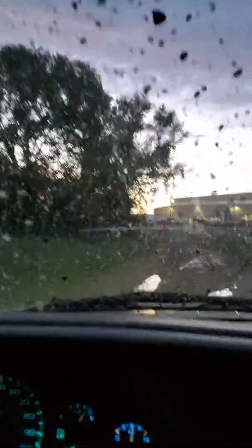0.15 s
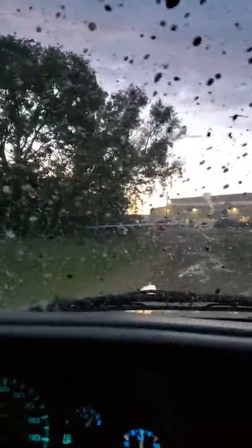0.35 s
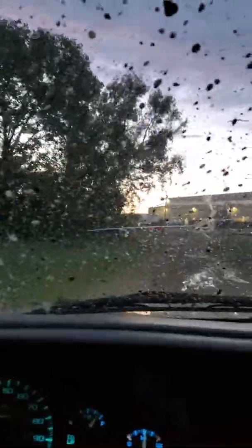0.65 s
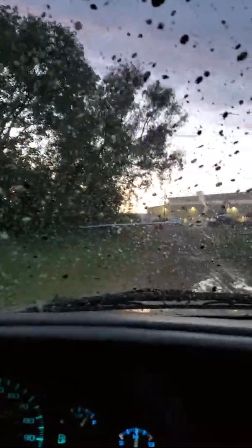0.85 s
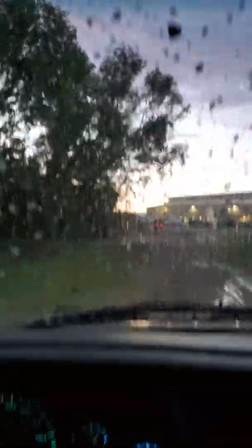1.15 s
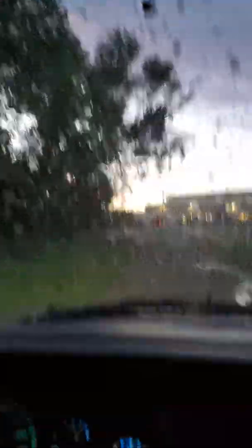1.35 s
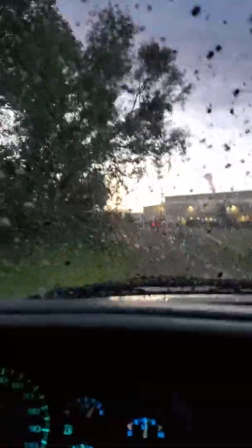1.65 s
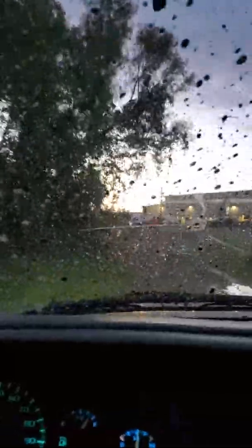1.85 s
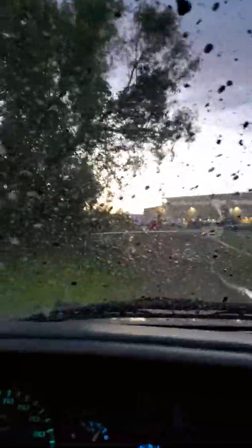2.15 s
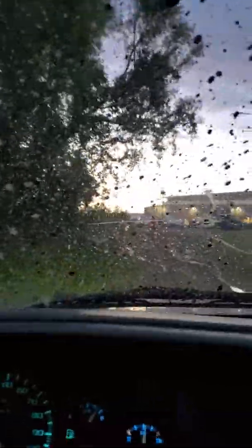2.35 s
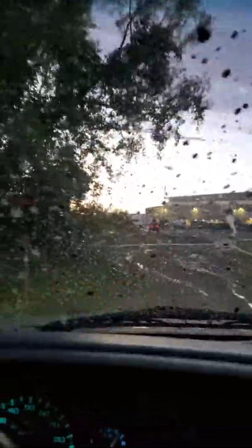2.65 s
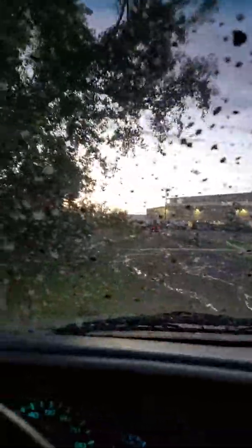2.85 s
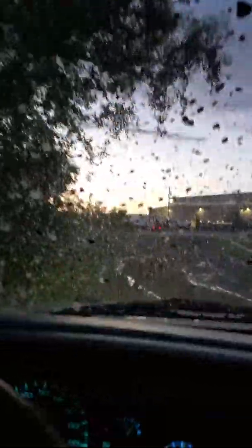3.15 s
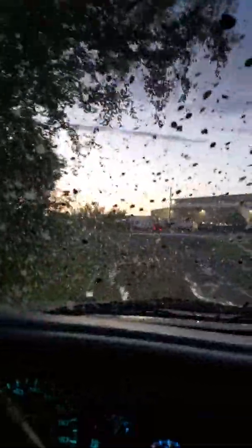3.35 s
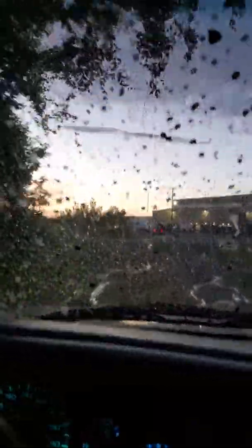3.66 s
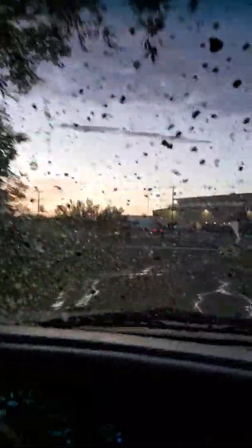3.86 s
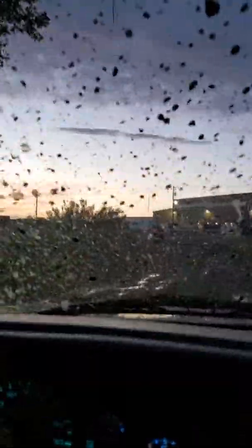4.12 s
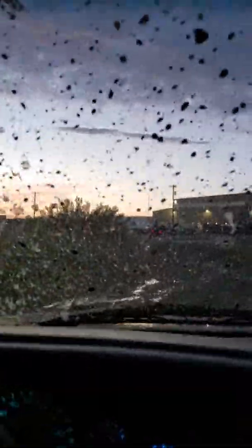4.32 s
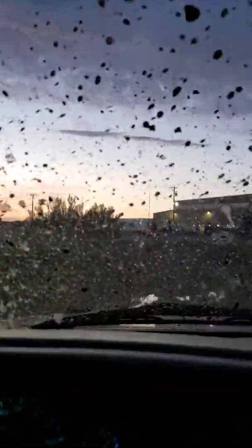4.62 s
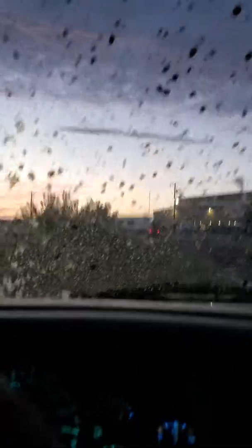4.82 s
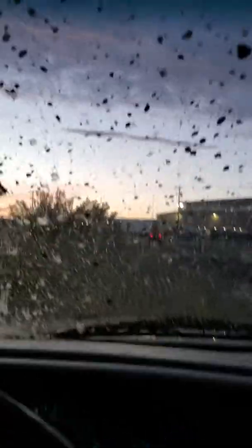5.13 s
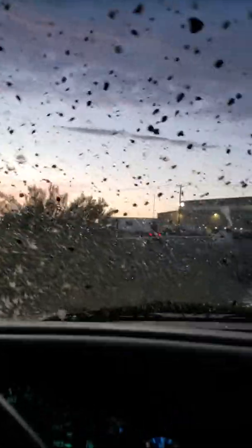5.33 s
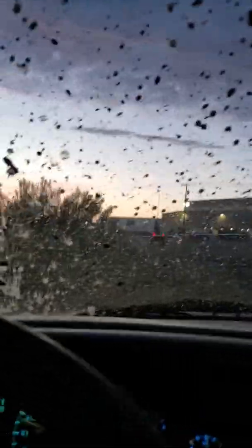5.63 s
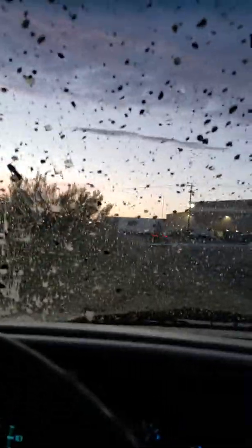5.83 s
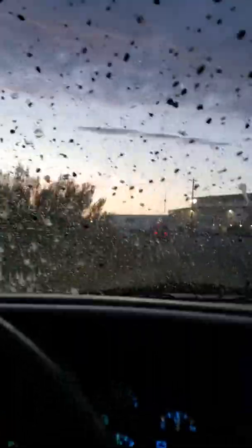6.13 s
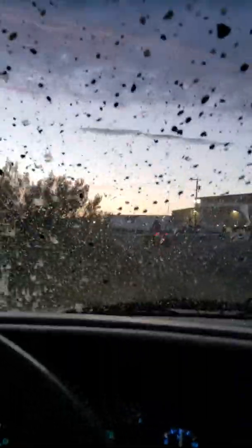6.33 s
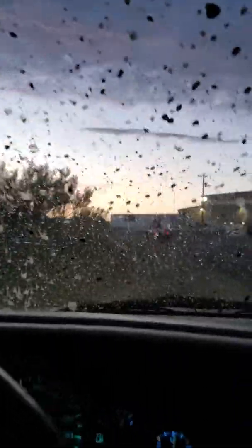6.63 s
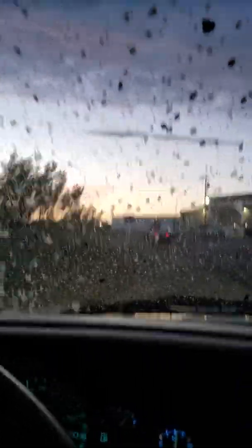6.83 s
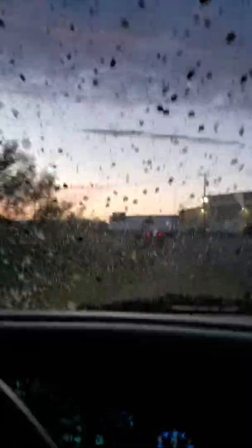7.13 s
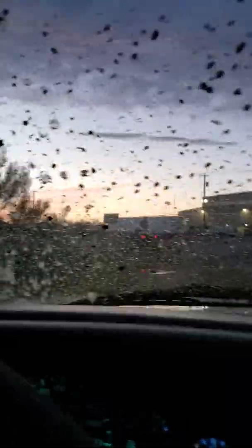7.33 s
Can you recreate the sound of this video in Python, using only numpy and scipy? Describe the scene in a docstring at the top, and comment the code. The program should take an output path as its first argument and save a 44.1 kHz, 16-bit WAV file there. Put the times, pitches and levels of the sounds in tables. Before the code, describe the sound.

A big engine drones from inside a vehicle on a muddy track, easing off as a loose part rattles and wheels splash through a rut.

```python
"""A V8 exhaust drones, then sinks towards idle, heard from the driver's seat of an SUV on muddy ground.
Close around a phone's two microphones, the body rumbles over ruts and a loose fitting clacks at the jolts.
Under the floor the tyres roar and hiss; late on, the front, then the rear wheels bang through a
water-filled rut and throw mud at the floor. Further off, the steering pump moans faintly."""
import sys
import numpy as np
from scipy import signal
from scipy.fft import rfft, irfft, next_fast_len
from scipy.io import wavfile
from scipy.ndimage import uniform_filter1d, map_coordinates

SR = 44100
rng = np.random.default_rng(int(sys.argv[2]) if len(sys.argv) > 2 else 0)


def output_pcm(signal):
    """Save a mono or channel-first signal as 16-bit PCM at the path in sys.argv[1].

    Samples are clipped to [-1, 1] before scaling.
    """
    pcm = np.clip(np.atleast_2d(signal).T, -1, 1) * 32767
    wavfile.write(sys.argv[1], SR, np.round(pcm).astype(np.int16))


N = 329868


# The exhaust from the driver's seat. Each row: time in seconds, firing rate in Hz, level in dB.
ENGINE_RUN = [(0, 109.3, -11.5), (.48, 108.6, -15), (.75, 104.8, -14.5), (.98, 100.9, -15.5),
              (1.2, 93.6, -18.5), (1.42, 87, -16.5), (1.78, 84.44, -16), (2.12, 76.76, -17.5),
              (2.41, 72.13, -18), (2.96, 71.32, -20), (3.46, 72.44, -17), (3.98, 70.64, -20),
              (4.25, 63.86, -28), (4.55, 56.82, -23), (5.6, 53.7, -26), (6.6, 51.02, -34),
              (7.48, 49.9, -28.5)]
# Lines beside the firing tone. Each row: multiple of the two-turn engine cycle, relative level in dB.
EXHAUST_ORDERS = [(3, -22), (4, -22), (5, -6), (6, -22), (7, -17), (9, -23), (10, -26), (11, -22),
                  (12, -35), (13, -31), (14, -33), (16, -32), (19, -33), (23, -38)]

def exhaust():
    """Eight firings a cycle give the drone; the uneven banks add other lines, stronger under load."""
    resonance_hz, width_hz, lift_db = 153, 16, 8.5  # the cab booms as one of those lines passes
    firing_hz, drone_db = curves(ENGINE_RUN)
    cycle_hz = firing_hz / 8
    cycle_phase = 2 * np.pi * np.cumsum(cycle_hz) / SR
    drone = np.sin(8 * cycle_phase)
    load_db = np.interp(firing_hz, [55, 72], [-4.5, -.5])
    for order, db in EXHAUST_ORDERS:
        boom_db = lift_db / (1 + ((order * cycle_hz - resonance_hz) / width_hz) ** 2)
        phase = order * cycle_phase + rng.uniform(0, 2 * np.pi) + 0.13 * wobble(7)
        drone += amp(db + load_db + boom_db + wobble(6)) * np.sin(phase)
    return amp(drone_db) * drone * panned(0.85)


# The bumps, as they come up through the seat. Each row: time in seconds, rumble level in dB.
BUMP_LEVELS = [(0, -20), (.7, -25), (1.3, -22.5), (1.7, -24), (2.2, -23.5), (2.9, -22), (3.55, -20.5),
               (4.3, -20.5), (5.2, -26), (5.8, -19), (6.4, -23), (6.9, -27), (7.4, -29)]
# Body and floor, close around the microphones. Each row: frequency in Hz, relative level in dB.
RUMBLE_SPECTRUM = [(8, -45.5), (15, -24.5), (21, -38.5), (28, 4), (38, -3.5), (50, 5.5), (62, 1),
                   (80, -6.5), (110, -14.5), (200, -49.5), (400, -85.5)]
FLOOR_SPECTRUM = [(40, -38), (75, 10), (100, 0.5), (125, 1.5), (165, -2), (200, -14), (300, -25.5),
                  (600, -74.5)]

def body():
    """Bumps shake the body into a deep rumble and make the floor drum harder."""
    flat_ground_db, drum_per_bump = -24.5, 0.56
    rumble_db, = curves(BUMP_LEVELS)
    drum_db = -30 + drum_per_bump * (rumble_db - flat_ground_db)
    rumble = steadied(in_cab(noise(), RUMBLE_SPECTRUM), seconds=0.13)
    drumming = steadied(in_cab(noise(), FLOOR_SPECTRUM), seconds=0.22)
    return amp(rumble_db) * rumble + amp(drum_db) * drumming


# The axles meeting the rut, below the cab. Each row: start in seconds, level in dB.
AXLE_THUMPS = [(5.935, -3.5), (6.029, -10), (6.423, -8.5)]
# Mud on the wheel wells. Each row: start in seconds, level in dB, treble against that level in dB.
MUD_SLAPS = [(5.86, -29, -24.5), (5.907, -33, -27.5), (5.955, -28, -17.5), (6.003, -29.5, -6.5),
             (6.056, -26.5, -21), (6.131, -30, -7), (6.144, -28.5, -14), (6.157, -25, -26),
             (6.239, -26.5, -19.5), (6.288, -28.5, -14.5), (6.341, -32, -16), (6.367, -31, -11),
             (6.406, -27.5, -12.5), (6.46, -26, -17.5), (6.506, -26.5, -25), (6.549, -34.5, -12),
             (6.589, -32, -24.5)]
# Floor boom, spray and bright ticks, from inside. Each row: frequency in Hz, relative level in dB.
BOOM_SPECTRUM = [(24, -28), (40, 5), (81, 4), (108, -6.5), (151, -7), (195, -23), (220, -12), (290, -35),
                 (480, -120)]
SPRAY_SPECTRUM = [(470, -13.5), (800, -2.5), (1180, -9), (1350, -6), (1470, -9), (1890, -3), (2340, -7),
                  (2490, -6.5), (3120, -9.5), (4890, -17), (5540, -21.5), (7200, -23), (8790, -22.5),
                  (15000, -24.5), (15800, -36.5)]
TICK_SPECTRUM = [(4000, -32.5), (6700, -7), (7700, -6.5), (8200, -13), (8800, -2), (10400, -1),
                 (11500, -5.5), (13800, -11.5), (14900, -0.5), (16000, -13)]

def rut_impacts():
    """The axles thump the body as they meet the rut; lumps of mud and water slap the wheel wells."""
    t = np.arange(SR // 3)[None] / SR
    thump = decay(t, t60=.48) * (1 - np.exp(-t / 0.017))
    slap = decay(t, t60=.14) * (1 - np.exp(-t / 0.0026))
    thumps, slaps, spatter = np.zeros((3, 1, N))
    for start, db in AXLE_THUMPS:
        add(thumps, start, amp(db) * thump)
    for start, db, treble_db in MUD_SLAPS:
        add(slaps, start, amp(db) * slap)
        add(spatter, start, amp(db + treble_db) * slap)
    boom = thumps * steadied(in_cab(noise(), BOOM_SPECTRUM), seconds=0.035)
    return boom + slaps * in_cab(noise(), SPRAY_SPECTRUM) + spatter * in_cab(noise(), TICK_SPECTRUM)


# Front, then rear wheels in the water. Each row: time of full level and hold in seconds, level in dB.
AXLE_WADES = [(5.962, 0.21, 1.5), (6.413, 0.096, -2)]

def wading(db, attack_s, t60):
    """The envelope of one part of the splash: it swells, holds and dies away for each axle."""
    t, power = np.arange(N) / SR, np.zeros(N)
    for full_at, hold, axle_db in AXLE_WADES:
        rise = np.exp(np.minimum(t - full_at, 0) / attack_s)
        fall = decay(np.maximum(t - full_at - hold, 0), t60)
        power += (amp(db + axle_db) * rise * fall) ** 2
    return np.sqrt(power)


# Water in the wheel wells, heard through the panels. Each row: frequency in Hz, relative level in dB.
WASH_SPECTRUM = [(100, -33), (170, 3), (198, -11.5), (441, -11.5), (488, -18), (641, -15.5), (698, -29),
                 (1300, -23), (1690, -29), (2860, -120)]

def puddle():
    """Water booms on the floor pan, washes through the wheel wells and breaks into drops."""
    boom = steadied(in_cab(noise(), BOOM_SPECTRUM), seconds=0.031)
    wash = in_cab(patter(per_s=240, spread_db=5.5, life_s=0.027), WASH_SPECTRUM)
    spray = in_cab(patter(per_s=340, spread_db=4.3, life_s=0.006), SPRAY_SPECTRUM)
    return (boom * wading(db=-22, attack_s=0.074, t60=0.31)
            + wash * wading(db=-28, attack_s=0.093, t60=0.64)
            + spray * wading(db=-33, attack_s=0.048, t60=0.53))


# The loose fitting at the harder jolts, close by. Each row: time in seconds, level in dB, treble in dB.
JOLT_CLACKS = [(0.1468, -40.5, -59.5), (0.3436, -32.5, -52), (0.4076, -39, -68.5), (0.634, -36.5, -62),
               (0.69, -31, -48.5), (0.7255, -30.5, -45.5), (0.7717, -35, -52.5), (0.9133, -37.5, -64),
               (1.0478, -30.5, -53), (1.1408, -27.5, -45), (1.2217, -36.5, -55.5), (1.2715, -32.5, -52.5),
               (1.3892, -25, -46), (1.4371, -27.5, -44.5), (1.6251, -27.5, -44.5), (1.6754, -27, -47),
               (1.7632, -29, -46.5), (1.8112, -35, -48.5), (1.8504, -26, -48), (1.8938, -27.5, -48),
               (2.216, -39, -57), (2.3313, -27.5, -46), (2.4783, -28.5, -48), (2.5119, -26.5, -46),
               (2.558, -29, -46), (2.793, -34, -55.5), (2.8897, -28.5, -51), (3.0745, -38, -59.5),
               (3.2629, -28.5, -46.5), (3.3976, -33, -48.5), (3.524, -30.5, -49), (3.5985, -33, -49.5),
               (3.9996, -33, -51.5), (4.0646, -29, -50), (4.1762, -29, -57), (4.3444, -38.5, -47),
               (4.3938, -32, -54.5), (4.4527, -28, -45), (4.5022, -26.5, -42.5), (4.6404, -29, -46),
               (5.0736, -37.5, -54), (5.2356, -26.5, -44), (5.5503, -26.5, -44.5), (5.609, -33, -56),
               (5.665, -22, -43), (5.7573, -32, -48.5), (6.7246, -45.5, -45.5), (6.7447, -37.5, -59.5),
               (6.7875, -30, -49.5), (7.0642, -32.5, -52.5), (7.1152, -29, -48), (7.21, -30, -47),
               (7.2499, -35, -51), (7.289, -32, -48)]
# Its modes. Each row: frequency in Hz, level in dB, t60 in seconds, left over right in dB.
FITTING_MODES = [(1250, -9, .1, -5), (1560, -10, .09, -6), (1880, -2, .11, -11), (2180, -3.5, .1, -9),
                 (2520, -5, .1, -5), (2660, -4, .07, -1), (3035, -4, .09, -2), (3240, -1.5, .09, -1),
                 (4220, -12, .07, 1), (5130, -11, .06, 2), (6750, -18, .06, 0), (7720, -17, .06, 7),
                 (9040, -17, .06, -6), (10000, -15, .06, -3), (10400, -15, .06, -1), (14750, -18, .05, 0)]
# The crack of its contact. Each row: frequency in Hz, relative level in dB.
CRACK_SPECTRUM = [(250, -35), (600, 5.5), (850, 4.5), (1500, -4), (2000, 1.5), (3300, .5), (3800, -5.5),
                  (5200, -7), (6000, -19), (8000, -19.5), (12000, -38)]

def loose_fitting():
    """Each clack is a contact and a rebound: a crack smeared by the cab, and the fitting's short ring."""
    def contact(age):
        return decay(age, t60=.046) * (1 - np.exp(-(age / .0018) ** 2))
    ring_db, crack_db, tick_db = -18, -2.5, 4.5
    t = np.arange(SR // 7) / SR
    hz, mode_db, t60, lean_db = np.transpose(FITTING_MODES)
    ring_onset = 1 - np.exp(-(t / 0.00033) ** 2)
    rings, cracks, ticks = np.zeros((3, 2, N))
    for time, db, treble_db in list(JOLT_CLACKS) + chatter():
        touch = time - .002  # the parts graze just before they strike
        strike = amp(mode_db + 3.35 * rng.standard_normal(len(hz))) * panned(lean_db)
        pitch = hz * (1 + 0.0033 * rng.standard_normal(len(hz)))  # it never seats the same way twice
        phase = rng.uniform(0, 2 * np.pi, (2, len(hz), 1))
        modes = decay(t, t60[:, None]) * np.sin(2 * np.pi * pitch[:, None] * t + phase)
        ring = (strike[..., None] * modes).sum(1) * ring_onset
        rebound_age = np.maximum(t - rng.uniform(0.0037, 0.022), 0)
        envelope = np.hypot(contact(t), 0.27 * contact(rebound_age))
        add(rings, touch, amp(db + ring_db) * ring)
        add(cracks, touch, amp(db + crack_db) * envelope * panned(rng.normal(-0.068, .9)))
        add(ticks, touch, amp(treble_db + tick_db) * envelope * panned(-.6))
    return rings + cracks * in_cab(noise(), CRACK_SPECTRUM) + ticks * in_cab(noise(), TICK_SPECTRUM)


# Mud on the track, under the wheels. Each row: time in seconds, tread hiss in dB.
MUD_LEVELS = [(.2, -59.5), (.65, -52.5), (.9, -58), (1.2, -51.5), (1.7, -51), (2.15, -58), (2.55, -51),
              (2.95, -55.5), (3.55, -54), (3.75, -59.5), (4.08, -47), (4.45, -49.5), (4.75, -52.5),
              (5.18, -58), (5.7, -45.5), (6.55, -48.5), (6.82, -47), (6.94, -55.5)]

def chatter(per_s=3.5, scatter_db=2.5, count=80):
    """Rows of faint extra clacks at random moments, stronger on muddy ground."""
    times = (np.arange(count) + rng.random(count)) / per_s
    levels = np.interp(times, *np.transpose(MUD_LEVELS)) + scatter_db * rng.uniform(-1, 1, count)
    return [(time, db + 14.5, db - 8.5) for time, db in zip(times, levels) if time < N / SR]


# Rolling speed, heard through the floor. Each row: time in seconds, roar on plain wet ground in dB.
ROLLING_LEVELS = [(0, -42), (2, -40), (2.9, -43), (3.9, -40), (4.8, -42), (5.7, -39.5), (6.5, -41),
                  (6.85, -47.5), (7.4, -43)]
# Tyre roar and tread hiss at the seat. Each row: frequency in Hz, relative level in dB.
ROAR_SPECTRUM = [(120, -26), (190, -2), (235, 3), (310, 0.5), (360, -0.5), (400, 2), (490, -3.5), (560, -8),
                 (650, -5), (900, -12), (1300, -18), (2500, -24), (6000, -41.5)]
HISS_SPECTRUM = [(530, -22), (900, -3), (1270, -2), (1470, -14.5), (1600, -1), (2100, -6.5), (2650, -10.5),
                 (3210, -8.5), (4500, -10.5), (5600, -18.5), (10500, -24), (15800, -45.5)]

def tyres():
    """Rolling makes the tyres roar; mud makes them louder and adds fizz and flung drops."""
    wet_ground_db, roar_per_mud, drops_per_mud = -55.5, 0.28, 0.36
    hiss_db, = curves(MUD_LEVELS)
    rolling_db, = curves(ROLLING_LEVELS)
    mud_db = hiss_db - wet_ground_db
    roar_db = rolling_db + roar_per_mud * mud_db + wobble(16)
    drops_db = hiss_db - 5 + drops_per_mud * mud_db
    roar = in_cab(noise(), ROAR_SPECTRUM)
    fizz = in_cab(patter(per_s=300, spread_db=3, life_s=0.012), HISS_SPECTRUM)
    drops = in_cab(patter(per_s=90, spread_db=4.5, life_s=0.005), SPRAY_SPECTRUM)
    return amp(roar_db) * roar + amp(hiss_db) * fizz + amp(drops_db) * drops


# The pump, faint from the seat. Each row: start and length in seconds, pitch in Hz, level in dB.
PUMP_MOANS = [(4.82, .14, 392, -41), (4.76, 0.171, 220, -38), (5.19, 0.081, 394, -45.5),
              (5.33, 0.11, 390, -40.5), (7.08, .31, 425, -40)]

def steering_pump(fade_s=0.045, flat_hz=12):
    """A slightly unsteady moan while the wheel is being turned; its pitch comes up with its level."""
    t, moan = np.arange(N) / SR, np.zeros(N)
    for start, length, hz, db in PUMP_MOANS:
        effort = np.clip(1 + np.minimum(t - start, start + length - t) / fade_s, 0, 1)
        pitch = hz - flat_hz * (1 - effort) + 3 * wobble(25)
        moan += effort * amp(db + 2.9 * wobble(22)) * np.sin(2 * np.pi * np.cumsum(pitch) / SR)
    return moan * panned(.5)


# A whine far in the background, alike at both microphones. Each row: frequency in Hz, level in dB.
WHINE_TONES = [(7440, -91.5), (9300, -81), (11160, -88), (13020, -89), (14880, -85.5)]

def electrical_whine():
    """A very thin, steady electrical whine."""
    t = np.arange(N) / SR
    return sum(amp(db) * np.sin(2 * np.pi * hz * t + .6 * wobble(40)) for hz, db in WHINE_TONES)


# The cab around the microphones. Each row: frequency in Hz, t60 in seconds.
CAB_DECAY = [(200, 0.24), (2000, 0.055), (6000, 0.074), (15000, 0.06)]

def cab_reverb(x):
    """The short, padded reverberation of the cab."""
    hz, t, spectra = signal.stft(rng.standard_normal((2, SR // 4)), SR, nperseg=256)
    _, tail = signal.istft(spectra * decay(t, along(CAB_DECAY, hz)[:, None]), SR, nperseg=256)
    return signal.fftconvolve(x, tail / np.linalg.norm(tail[0]), axes=1)[:, :N]


# How alike the two microphones hear the cab. Each row: frequency in Hz, correlation from 0 to 1.
MIC_LIKENESS = [(60, 1), (170, 0.96), (350, 0.54), (700, 0.48), (1400, 0.064), (8000, 0.0097)]
# The balance at the driver's seat. Each row: frequency in Hz, left over right in dB.
MIC_BALANCE = [(60, -2.3), (110, 1), (200, 1.5), (380, 0.5), (700, 0.0), (1290, -3.5), (2380, -6.5),
               (4400, 0.5), (8120, 1), (15000, -2)]

def in_cab(pair, spectrum):
    """Two unrelated signals become a coloured cab sound of rms 1: bass alike, treble diffuse."""
    def response(hz):
        spread = np.arccos(np.clip(along(MIC_LIKENESS, hz), -1, 1)) / 2
        return amp(along(spectrum, hz)) * [np.cos(spread), np.sin(spread)]
    mid, side = filtered(pair, response)
    left_right = np.array([mid + side, mid - side])
    return unit(filtered(left_right, lambda hz: panned(along(MIC_BALANCE, hz))))


def patter(per_s, spread_db, life_s):
    """Random drops of uneven size, each a quickly dying puff of noise."""
    hits = rng.random(N) < per_s / SR
    sizes = amp(spread_db * np.clip(rng.standard_normal(N), -2, 2))
    power = signal.lfilter([1], [1, -np.exp(-2 / (life_s * SR))], hits * sizes ** 2)
    return unit(np.sqrt(power) * noise())


def noise():
    """Two unrelated white noises."""
    return rng.standard_normal((2, N))


def steadied(x, seconds):
    """Even out the slow swells of a noise."""
    power = uniform_filter1d(np.mean(x ** 2, 0), int(seconds * SR))
    return x / np.sqrt(np.abs(power) + 0.014)


def wobble(rate):
    """A smooth random curve, rate knots a second."""
    return map_coordinates(rng.standard_normal(int(N * rate / SR) + 4), [np.arange(N) * rate / SR])


def amp(db):
    """Decibels to gain."""
    return 10 ** (np.asarray(db) / 20)


def decay(t, t60):
    """A gain that falls 60 dB in t60 seconds."""
    return amp(-60 * t / t60)


def unit(x):
    """Scale to rms 1."""
    return x / np.sqrt(np.mean(x ** 2) + 1e-20)


def along(points, hz):
    """(Hz, value) points read on a log axis."""
    knots_hz, values = np.transpose(points)
    return np.interp(np.log(hz + 1), np.log(knots_hz + 1), values)


def curves(rows):
    """One value per sample for each column after the time."""
    times, *columns = np.transpose(rows)
    return [np.interp(np.arange(N) / SR, times, column) for column in columns]


def filtered(x, response):
    """Filter x by a response, a function of frequency in Hz."""
    size = next_fast_len(N + SR // 4)
    return irfft(rfft(x, size) * response(np.fft.rfftfreq(size, 1 / SR)), size)[..., :N]


def panned(lean_db):
    """Left and right gains for a level difference."""
    return amp(np.array([np.atleast_1d(lean_db), -np.atleast_1d(lean_db)]) / 2)


def add(track, start, sound):
    """Mix a sound in, start seconds along the track."""
    span = track[:, max(round(start * SR), 0):][:, :sound.shape[-1]]
    span += sound[:, :span.shape[-1]]


def scene():
    """Exhaust, ground, rattle and pump as heard from the driver's seat."""
    clacks = loose_fitting()
    foreground = exhaust() + body() + rut_impacts() + puddle() + clacks + cab_reverb(clacks)
    return foreground + tyres() + steering_pump() + electrical_whine()


def record(dry):
    """A phone with two microphones a little apart; it rounds the tallest peaks and cuts the top treble."""
    ceiling, top_hz, left_lag_s = .95, 15780, .00009
    rounded = dry / (1 + np.abs(dry / ceiling) ** 8) ** (1 / 8)
    def response(hz):
        return (hz < top_hz) * np.exp(np.outer([-1j, 1j], np.pi * hz * left_lag_s))
    return filtered(rounded, response)


dry = scene()
out = record(dry)
output_pcm(out)
```